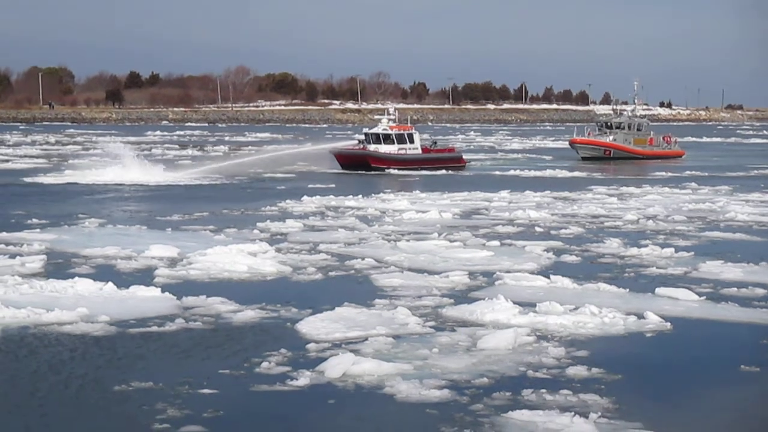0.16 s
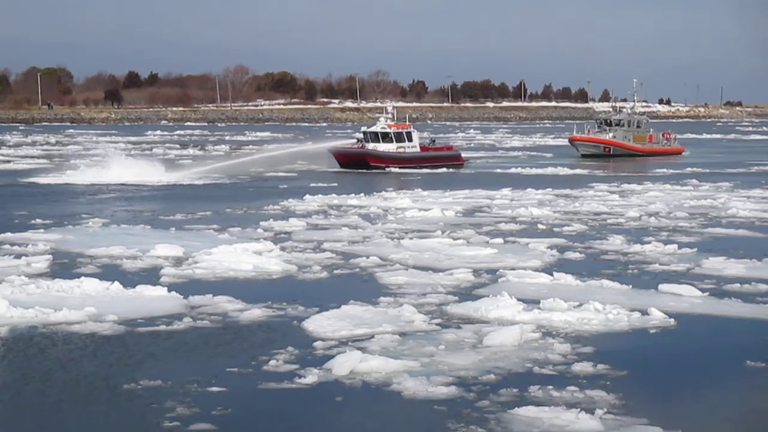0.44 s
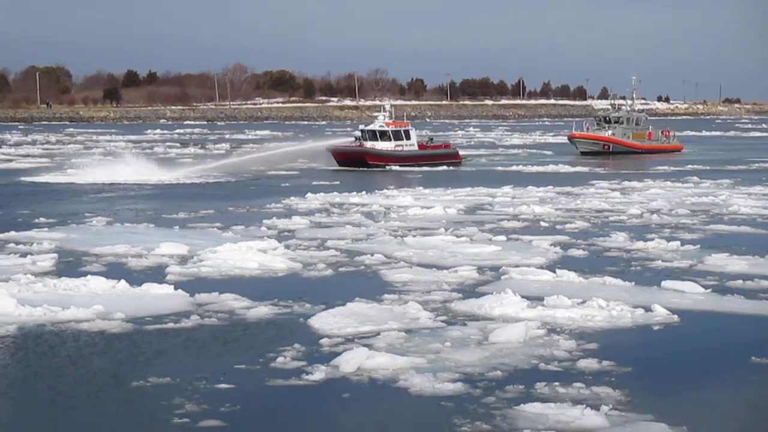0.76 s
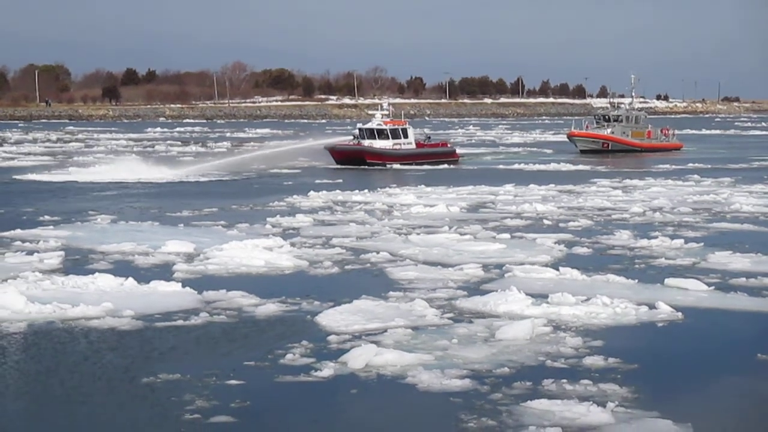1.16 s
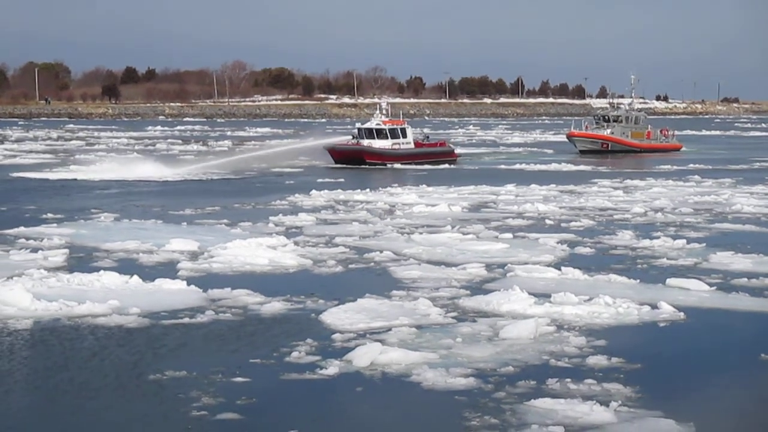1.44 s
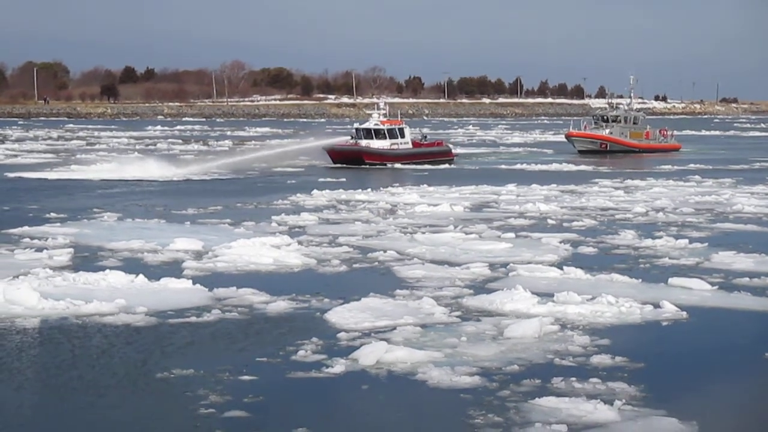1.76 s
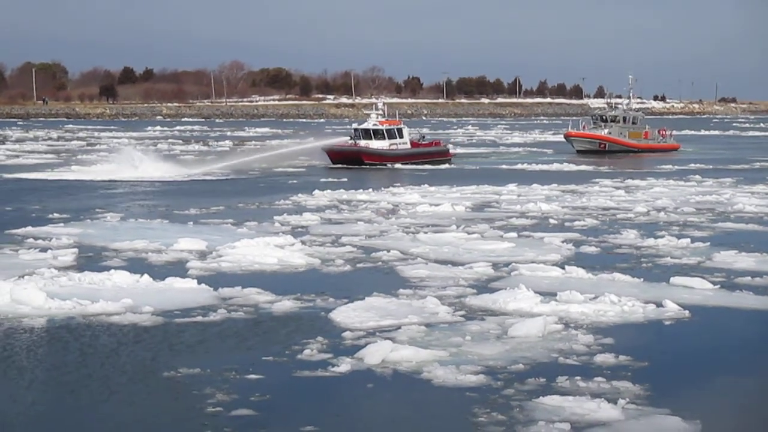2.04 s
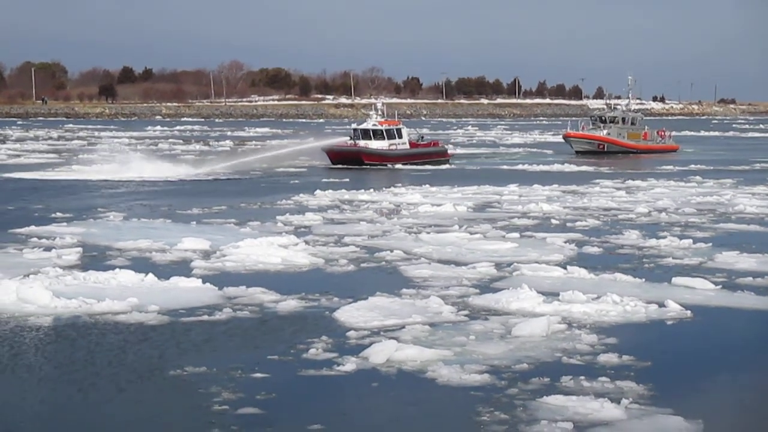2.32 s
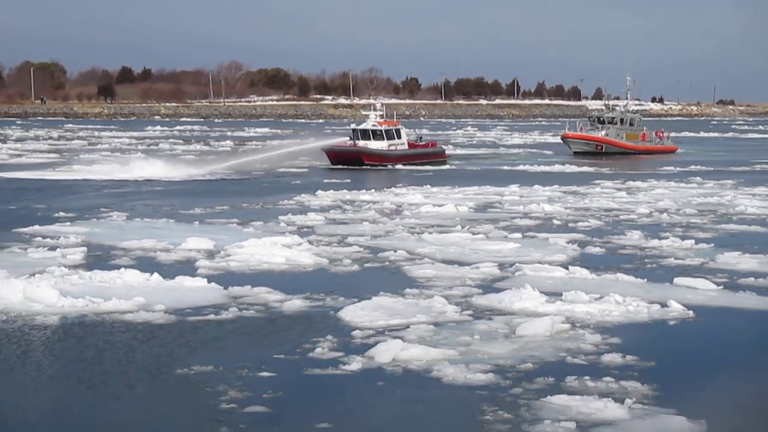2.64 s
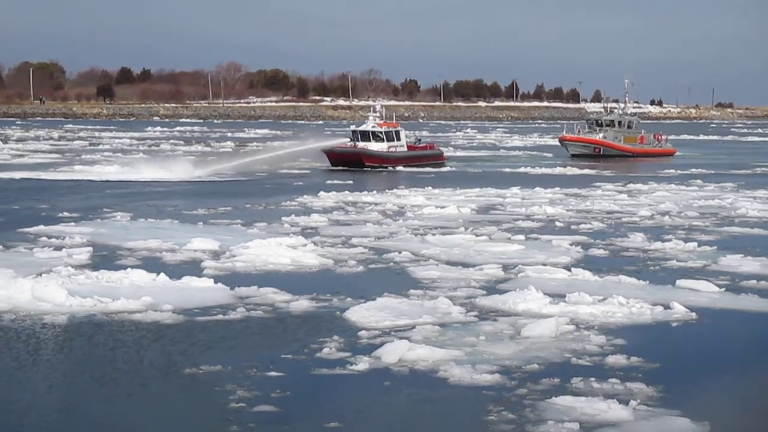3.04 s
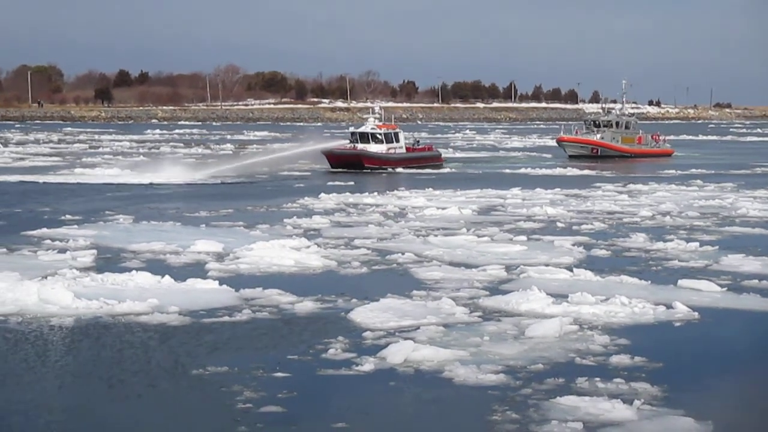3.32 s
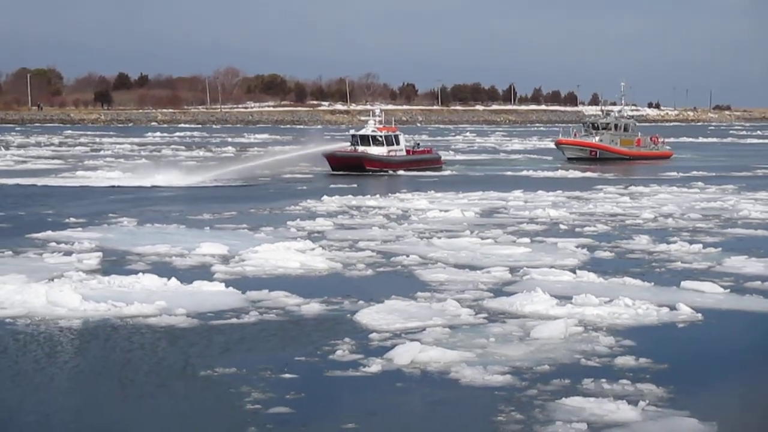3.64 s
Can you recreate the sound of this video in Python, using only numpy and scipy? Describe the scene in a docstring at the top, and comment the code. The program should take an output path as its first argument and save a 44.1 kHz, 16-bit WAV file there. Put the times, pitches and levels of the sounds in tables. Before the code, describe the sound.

A low, steady boat engine rumble carries across open water while gusts buffet the microphone with dull pops. A distant water jet splashes down in hissing surges, stronger in the second half, when a hollow whirr climbs in pitch.

```python
"""A boat's diesel drones at steady speed, some way off in an icy waterway where two boats are working.
It drives a water cannon, whose jet hisses in surges as it falls on the water.
A hollow motor whirr rises in the second half. Close up, gusts rumble on the microphone,
and single eddies hit it with dull pops."""
import sys
import numpy as np
from scipy import signal
from scipy.fft import rfft, irfft, next_fast_len
from scipy.io import wavfile

SR = 44100
rng = np.random.default_rng(int(sys.argv[2]) if len(sys.argv) > 2 else 0)


def wrap_up_sound(samples):
    """Save the sound to the file named by the first command line argument, as 16-bit audio."""
    columns = np.atleast_2d(samples).T
    # keep every value between -1 and 1, then stretch to whole-number steps
    tamed = np.clip(columns, -1, 1)
    steps = np.round(tamed * 32767).astype(np.int16)
    wavfile.write(sys.argv[1], SR, steps)


N = 166698

# The exhaust, heard across the water: time_s, level_db
EXHAUST_LEVEL = [(0, -29), (.5, -26), (.8, -22.5), (1.3, -19), (1.5, -21.5), (2.45, -22), (2.85, -17.5),
                 (3.4, -22), (3.78, -23.5)]
# Its harmonics: multiple_of_engine_rate, relative_db
EXHAUST_ORDERS = [(2, 1.5), (3, -10), (4, -8.5), (5, -19.5), (6, -23), (8, -28.5), (10, -34.5), (12, -28)]
# Machinery and pump tones: pitch_hz, level_db
PUMP_TONES = [(470, -47.5), (535, -52.5), (715, -56)]
# Broad engine roar: frequency_hz, relative_db
ROAR_SPECTRUM = [(40, -12.5), (90, 15.5), (160, 3.5), (240, 3), (350, -18.5), (480, -8), (650, -9),
                 (850, -26), (1600, -36.5)]

def diesel(engine_hz=40.05, waver_db=0.3228, waver_rad=0.079, throb_depth=0.43):
    """Distant exhaust pulses, strong and weak in turn, over machinery tones and a throbbing roar."""
    level_db, = in_time(EXHAUST_LEVEL)
    turn = 2 * np.pi * engine_hz * np.arange(N) / SR
    exhaust = 0
    for order, db in EXHAUST_ORDERS:  # higher harmonics waver more
        phase = order * (turn + waver_rad * drift(1.62))
        gain = from_db(db + waver_db * order * drift(8))
        exhaust -= np.sqrt(2) * gain * np.cos(phase)
    tones = sum(from_db(db) * narrow_noise(hz, width_hz=7) for hz, db in PUMP_TONES)
    throb = 1 + throb_depth * np.cos(2 * turn)
    roar = from_db(-32.5) * banded_noise(ROAR_SPECTRUM, flicker_db=2.5)
    return from_db(level_db) * exhaust + tones + throb * roar


# Surges of the falling jet: time_s, hiss_db, splatter_db, mist_db (each before its trim)
JET_SURGES = [(0.08, -59.5, -62.5, -77), (0.29, -52, -55.5, -72), (0.5, -56, -54, -67),
              (0.74, -54, -58, -70), (0.92, -52.5, -56, -65.5), (1.26, -52.5, -53.5, -68.5),
              (1.43, -58, -59, -73), (1.69, -60, -59, -69), (1.82, -49.5, -58, -71.5), (2.0, -49, -52, -68),
              (2.22, -48.5, -50, -64), (2.39, -43.5, -45, -64), (2.63, -48.5, -51.5, -64),
              (2.87, -49, -46.5, -64), (3.18, -42.5, -47, -60.5), (3.39, -50.5, -52.5, -66),
              (3.75, -46, -50.5, -63)]
# Heavy water landing: time_s, level_db
WASH_LEVEL = [(0, -51.5), (.45, -45), (1.25, -45.5), (1.65, -47), (2.35, -39), (3.15, -38), (3.4, -40),
              (3.78, -39.5)]
# The water's four colours at this distance: frequency_hz, relative_db
WASH_SPECTRUM = [(200, -8.5), (400, 8.5), (700, 0.5), (1000, 0.5), (1400, -4.5), (1800, -6), (2200, -8),
                 (3000, -18.5), (6000, -45)]
HISS_SPECTRUM = [(1200, -36.5), (2150, -14.5), (2350, 0), (2560, 2.5), (2720, -1), (2900, 4.5), (3250, -6),
                 (4000, -19), (6000, -56.5)]
SPLATTER_SPECTRUM = [(2300, -27.5), (3300, 2), (3750, -0.5), (4250, -5.5), (4900, -6), (5600, -8.5),
                     (6000, -12.5), (6500, -22), (9000, -35)]
MIST_SPECTRUM = [(5000, -6.5), (7000, 1), (8200, -3.5), (9300, -3), (10500, -11), (13000, -20),
                 (15500, -27.5)]

def water_cannon(hiss_trim_db=0.5, splatter_trim_db=-1, mist_trim_db=1):
    """The jet lands far off in surges: a low wash, a hiss of drops, their splatter and a fine mist."""
    hiss_db, splatter_db, mist_db = in_time(JET_SURGES)
    wash_db, = in_time(WASH_LEVEL)
    wash = from_db(wash_db) * spray_noise(WASH_SPECTRUM, flicker_db=0.68)
    hiss = from_db(hiss_db + hiss_trim_db) * spray_noise(HISS_SPECTRUM, flicker_db=0.3)
    splatter = from_db(splatter_db + splatter_trim_db) * spray_noise(SPLATTER_SPECTRUM, flicker_db=0.6)
    mist = from_db(mist_db + mist_trim_db) * spray_noise(MIST_SPECTRUM, flicker_db=1.0)
    return wash + hiss + splatter + mist


# The motor's upper resonance: time_s, pitch_hz, level_db
WHIRR_CURVE = [(0, 470, -60), (1.9, 478.4, -44.5), (2.4, 491.4, -42), (2.85, 517.1, -33),
               (3.03, 582.3, -40), (3.2, 640, -33.5), (3.38, 602.2, -41), (3.78, 610.5, -34)]

def motor_whirr(width_hz=130, lower_ratio=0.84, lower_db=-8):
    """Two rough resonances climb together as a motor gathers speed."""
    pitch_hz, level_db = in_time(WHIRR_CURVE)
    upper = narrow_noise(pitch_hz, width_hz)
    lower = from_db(lower_db) * narrow_noise(pitch_hz * lower_ratio, width_hz)
    return from_db(level_db) * (upper + lower)


# Wind strength at the microphone: time_s, relative_db
GUSTS = [(0, -29.5), (.04, -23.5), (.2, -27), (.31, -19), (.4, -36), (.56, -33.5), (.62, -23), (.72, -26.5),
         (.8, -43), (.96, -49), (1.02, -23.5), (1.13, -33.5), (1.22, -23), (1.55, -45), (1.72, -57),
         (2.08, -28), (2.6, -30.5), (2.9, -25), (3.05, -31), (3.57, -22.5), (3.78, -33.5)]
# Its buffeting: frequency_hz, relative_db
WIND_SPECTRUM = [(15, 1.5), (30, 2.5), (60, 2.5), (135, -2.5), (200, -7.5), (300, -15), (450, -25.5),
                 (700, -37.5), (1200, -50), (2500, -70)]

def wind(gain_db=5.5, lump_db=-1.5):
    """Turbulence right on the microphone: a lumpy rumble that follows the gusts."""
    gust_db, = in_time(GUSTS)
    lumps = rms_one(from_db(lump_db * np.clip(drift(19), -2, 2)))
    return from_db(gust_db + gain_db) * lumps * banded_noise(WIND_SPECTRUM, flicker_db=-0.5)


# Hits on the microphone: time_s, peak_db, body_hz, edge_hz, flutter_db, flutter_width_s
EDDY_HITS = [(.028, -9.5, 150, 440, -14, 0.0034), (0.049, -17, 200, 700, -18, 0.0042),
             (0.079, -9.5, 80, 509, -14, 0.0024), (0.138, -16.5, 200, 850, -25, 0.014),
             (.289, -12, 200, 600, -18, 0.0049), (.3195, -5, 110, 1081, -17, 0.0016),
             (.632, -6, 400, 700, -27, .002), (.638, -6.5, 900, 1494, -9.5, 0.0029),
             (.644, -6.5, 2000, 791, -22, 0.0028), (.708, -6, 100, 760, -15.5, .005),
             (1.04, -17.5, 300, 560, -15.5, 0.0021), (1.079, -17.5, 80, 280, -14.5, 0.0074),
             (1.174, -18, 500, 1300, -23, .0012), (1.192, -14.5, 40, 100, -11, 0.007),
             (1.215, -11.5, 250, 950, -21, 0.0024), (1.308, -3.5, 130, 1307, -29, 0.0058),
             (1.312, -7, 200, 380, -13, 0.012), (1.389, -9.5, 120, 546, -21, 0.0047),
             (1.482, -2.5, 213, 720, -17, 0.0046), (1.599, -11, 185, 350, -29, .0028),
             (2.125, -16, 185, 662, -25, 0.012), (2.243, -13.5, 150, 750, -22, 0.0072),
             (2.338, -9.5, 120, 280, -6, 0.0021), (2.452, -18.5, 40, 90, -15, 0.011),
             (2.866, -9, 45, 110.1, -17.5, 0.024), (2.949, -12, 130, 500, -15.5, 0.013),
             (3.118, -15.5, 100, 220, -7, 0.0063), (3.209, -5, 140, 330, -11, 0.0091),
             (3.320, -14, 185, 523, -17, 0.0098), (3.53, -9.5, 150, 527, -22, 0.0093),
             (3.573, -6.5, 40, 100.1, -14, .008)]

def eddies(low_cut_hz=32.6, unrest=0.3743):
    """Each eddy strikes the microphone as one pressure spike inside a brief, uneven flutter."""
    out, t = 0, np.arange(N) / SR
    for time_s, peak_db, body_hz, edge_hz, flutter_db, width_s in EDDY_HITS:
        click = signal.unit_impulse(N, int(time_s * SR))
        spike = butter(click, body_hz, "low", order=1)
        spike = butter(spike, low_cut_hz, "high")
        spike = butter(spike, edge_hz, "low", order=8)
        centre_hz = 22.34 + .3 * edge_hz  # brighter pops flutter faster
        flutter_hz = centre_hz * (1 + unrest * drift(212.8))
        envelope = np.exp(-.5 * ((t - time_s) / width_s) ** 2)
        flutter = np.sqrt(2) * np.sin(2 * np.pi * np.cumsum(flutter_hz) / SR) * envelope
        out += from_db(peak_db) * spike / np.abs(spike).max() + from_db(flutter_db) * flutter
    return out


def spray_noise(spectrum, flicker_db):
    """Countless far drops merge into coloured noise with a slight flicker."""
    hz, db = np.transpose(spectrum)
    size = next_fast_len(N)
    bin_hz = np.arange(size // 2 + 1) * SR / size + 1
    colour = from_db(np.interp(np.log(bin_hz), np.log(hz), db))
    skirts = np.minimum(1, np.minimum(bin_hz / hz[0], hz[-1] / bin_hz)) ** 4
    noise = irfft(rfft(rng.standard_normal(size)) * colour * skirts, size)[:N]
    return rms_one(noise) * from_db(flicker_db * drift(23))


def banded_noise(spectrum, flicker_db):
    """Quarter-octave noise bands, each with its own level and flicker; rms 1."""
    hz, db = np.transpose(spectrum)
    edges_hz = 15 * 2 ** np.arange(0, 10.3, .25)
    out, white = 0, rng.standard_normal((2, N + SR // 4))
    for k, (low, high) in enumerate(zip(edges_hz, edges_hz[1:])):
        centre, flicker = np.sqrt(low * high), drift(9.3)
        if hz[0] <= centre <= hz[-1]:
            gain = from_db(np.interp(np.log(centre), np.log(hz), db) + flicker_db * flicker)
            out += gain * butter(white[k % 2], [low, high], "band")[-N:]
    return rms_one(out)


def narrow_noise(hz, width_hz):
    """Noise in a resonance whose centre may move; rms 1."""
    a, b = butter(rng.standard_normal((2, N)), width_hz / 2, "low")
    phase = 2 * np.pi * np.cumsum(hz * np.ones(N)) / SR
    return rms_one(a * np.cos(phase) + b * np.sin(phase))


def drift(rate_hz, step=40, settle=2000):
    """Smooth random wander of spread 1."""
    pole = np.exp(-2 * np.pi * step * rate_hz / SR)
    white = rng.standard_normal(N // step + settle + 2)
    slow = signal.lfilter([1], [1, -2 * pole, pole * pole], white)[settle:]
    return np.interp(np.arange(N) / step, np.arange(len(slow)), rms_one(slow))


def butter(x, hz, kind, order=2):
    """Causal Butterworth filter."""
    sections = signal.butter(order, np.clip(hz, 10, .45 * SR), kind, fs=SR, output="sos")
    return signal.sosfilt(sections, x + 1e-18)


def in_time(rows):
    """Each column of a curve at every sample."""
    time_s, *columns = np.transpose(rows)
    return [np.interp(np.arange(N) / SR, time_s, column) for column in columns]


def from_db(db):
    """Decibels to gain."""
    return 10 ** (np.asarray(db) / 20)


def rms_one(x):
    """Scale to unit rms."""
    return x / np.sqrt(np.mean(x ** 2) + 1e-20)


def scene():
    """Boats and spray in the distance, wind at the microphone; mono."""
    return (diesel() + motor_whirr() + water_cannon() + wind() + eddies())[None]


def record(dry):
    """The treble ends steeply at 15.7 kHz."""
    return signal.sosfilt(signal.ellip(10, .1, 70, 15700, fs=SR, output="sos"), dry)


dry = scene()
out = record(dry)
wrap_up_sound(out)
```